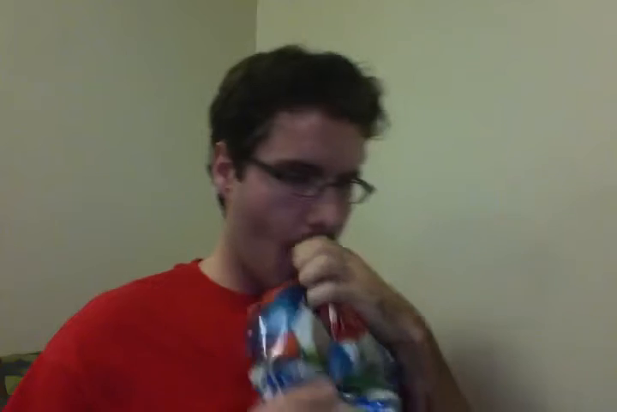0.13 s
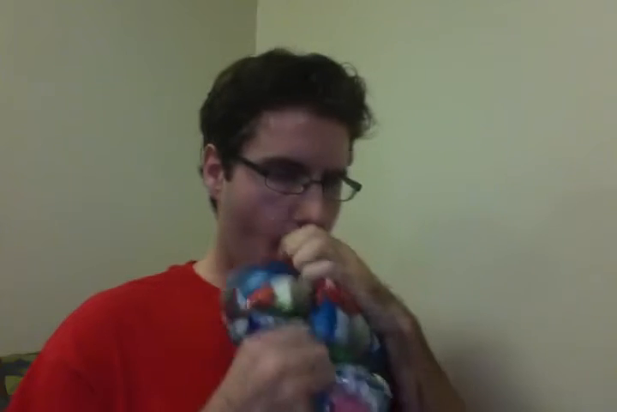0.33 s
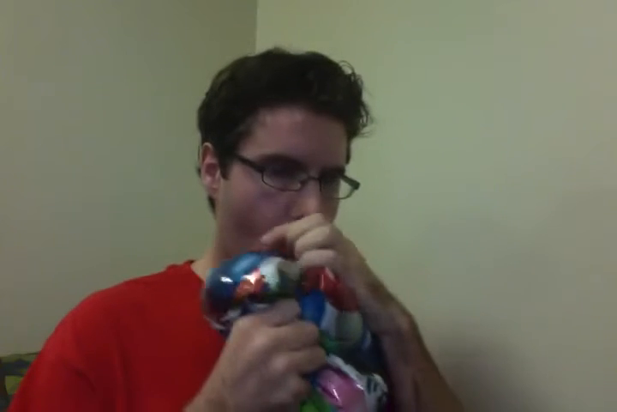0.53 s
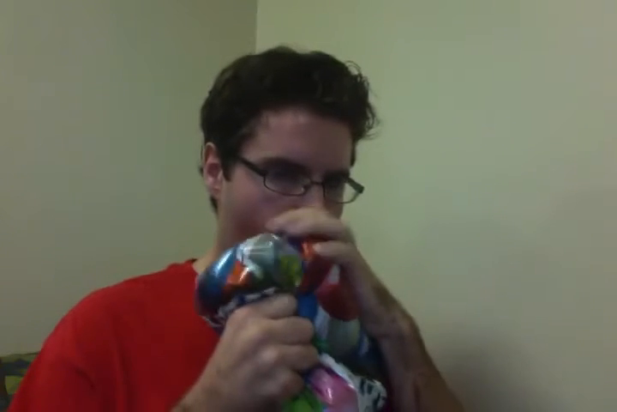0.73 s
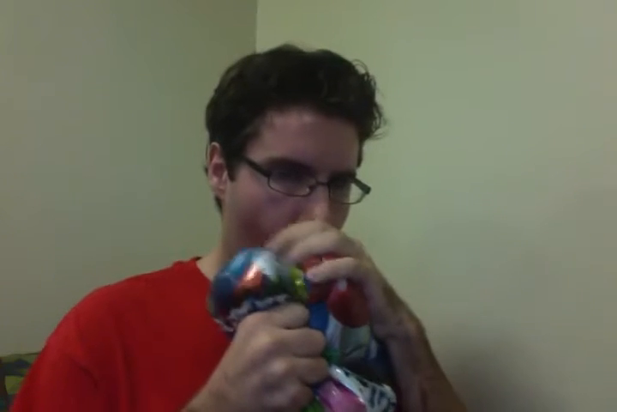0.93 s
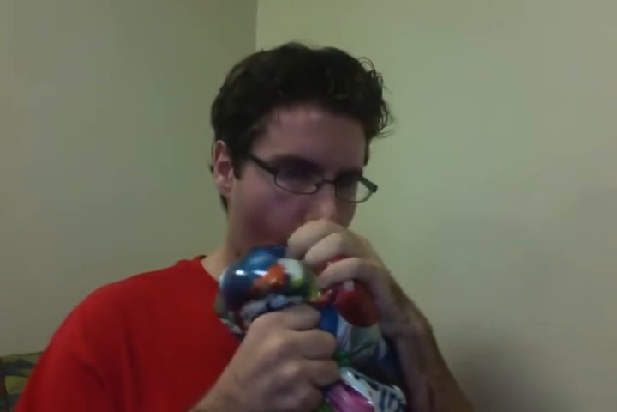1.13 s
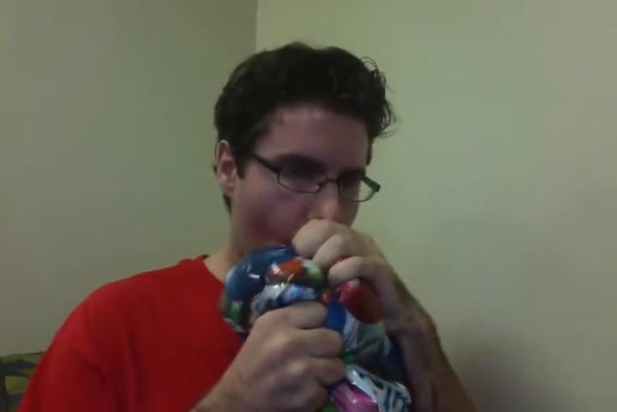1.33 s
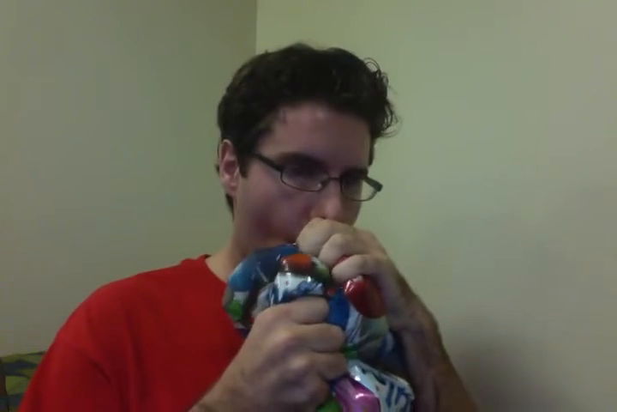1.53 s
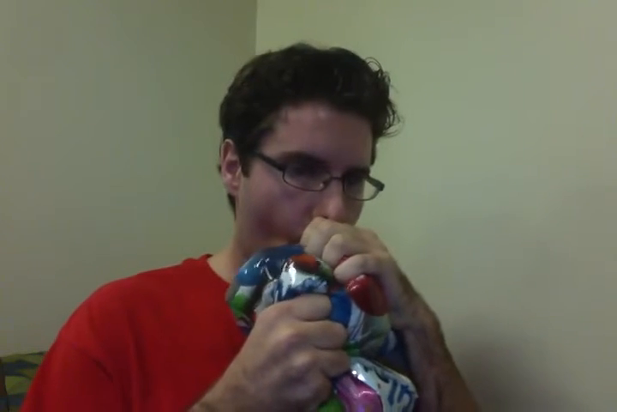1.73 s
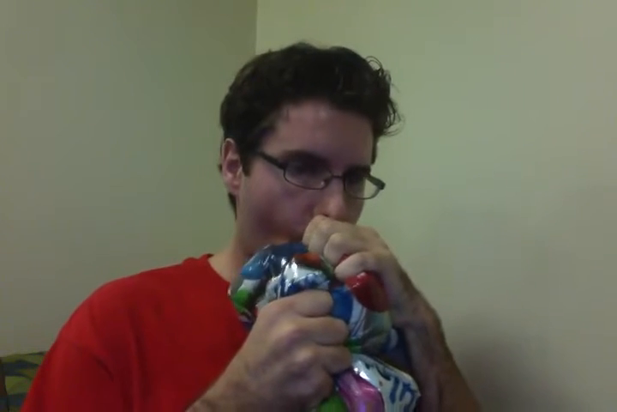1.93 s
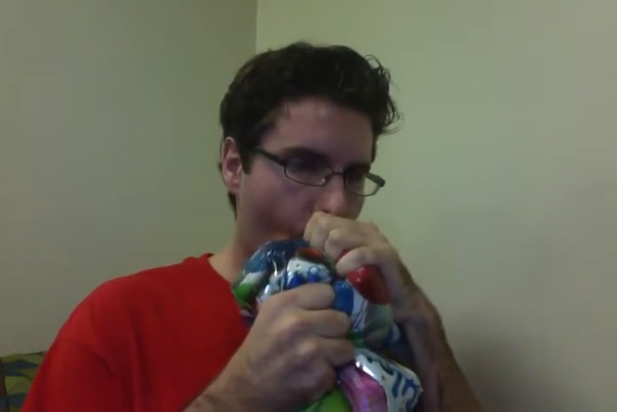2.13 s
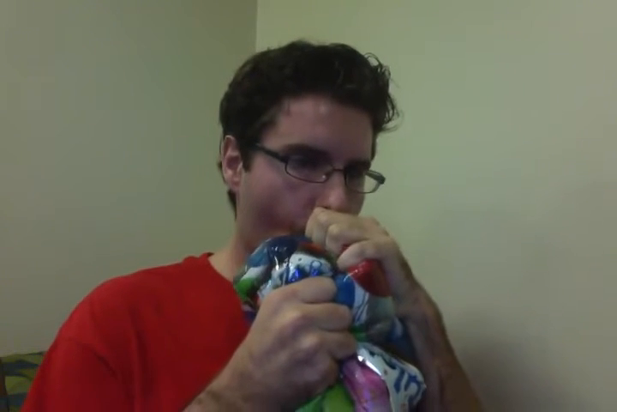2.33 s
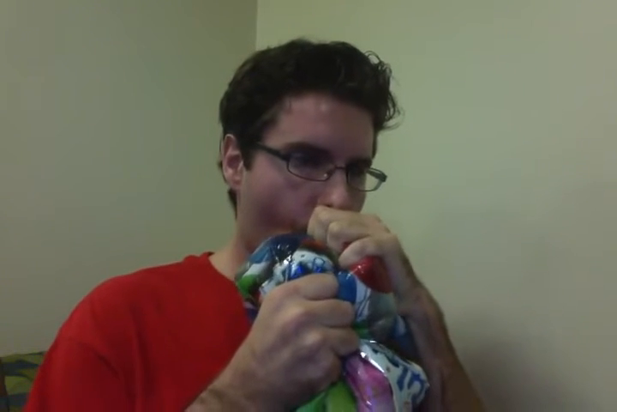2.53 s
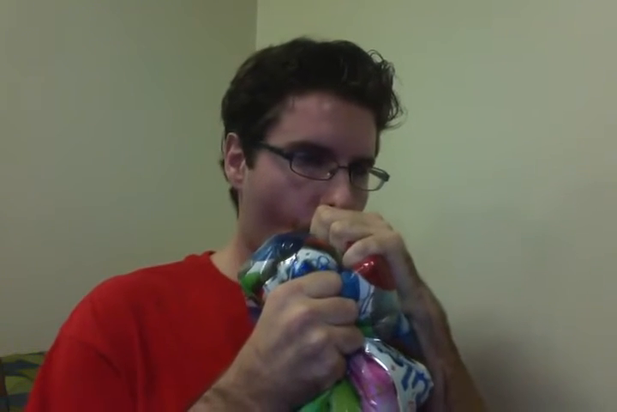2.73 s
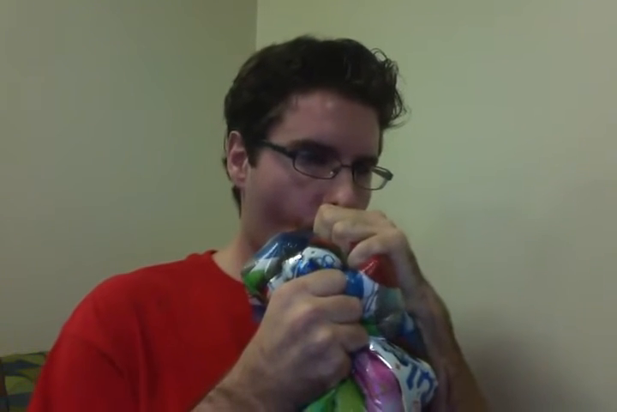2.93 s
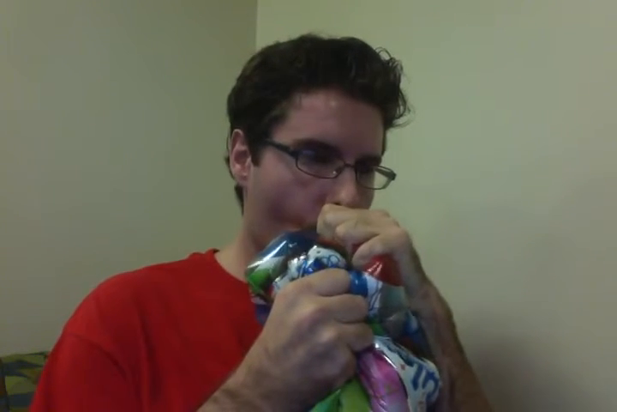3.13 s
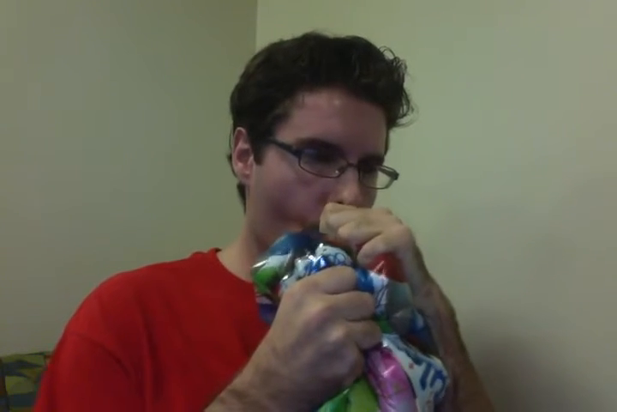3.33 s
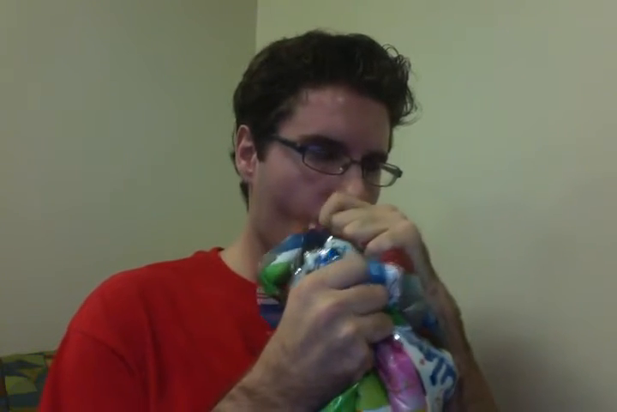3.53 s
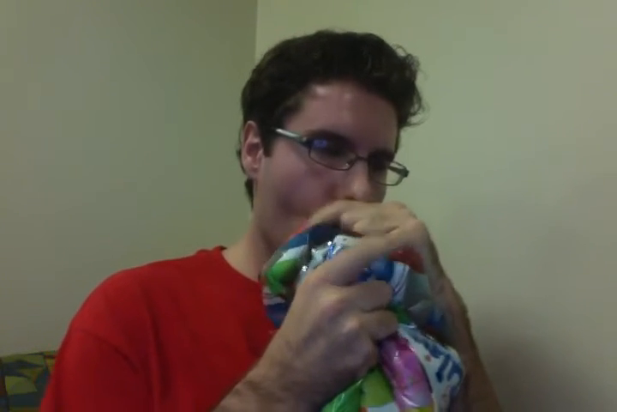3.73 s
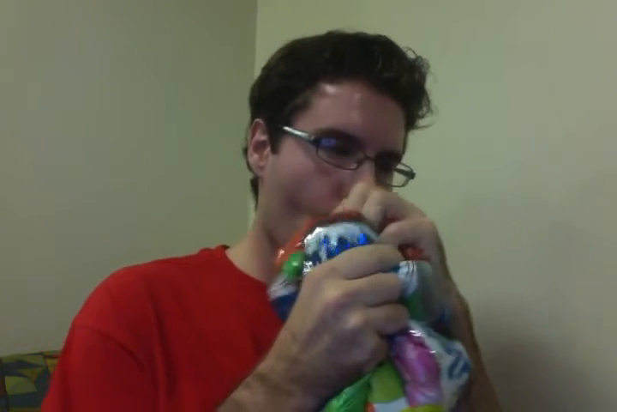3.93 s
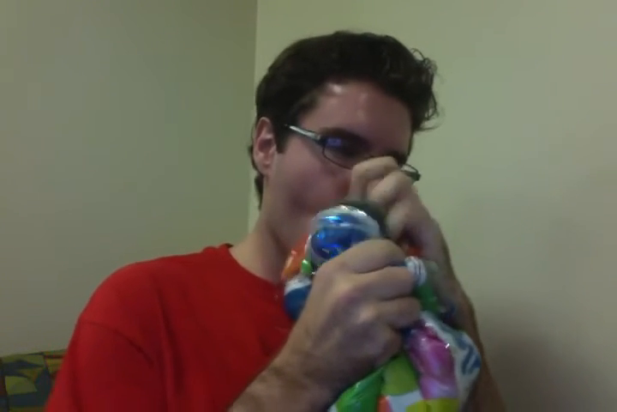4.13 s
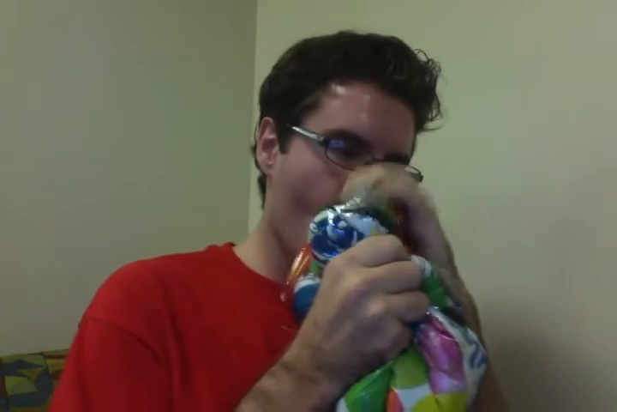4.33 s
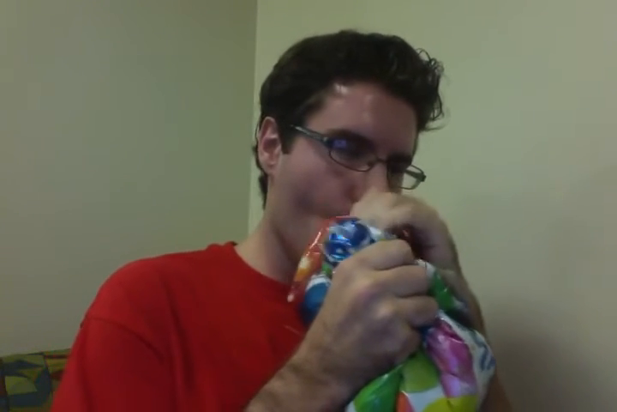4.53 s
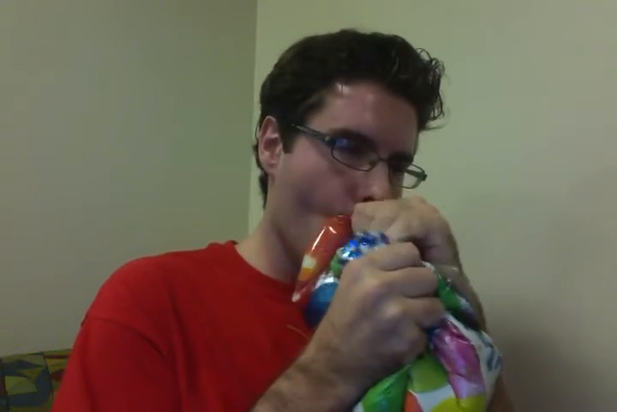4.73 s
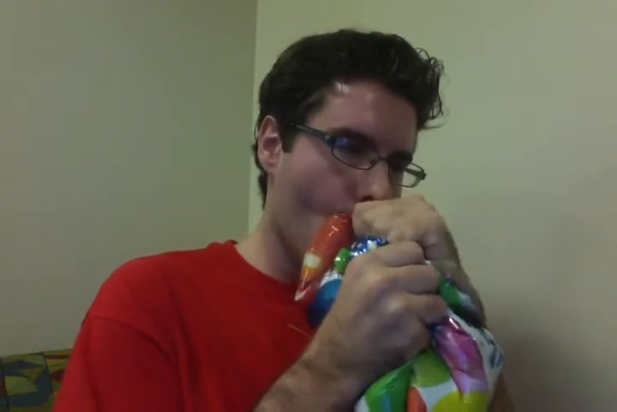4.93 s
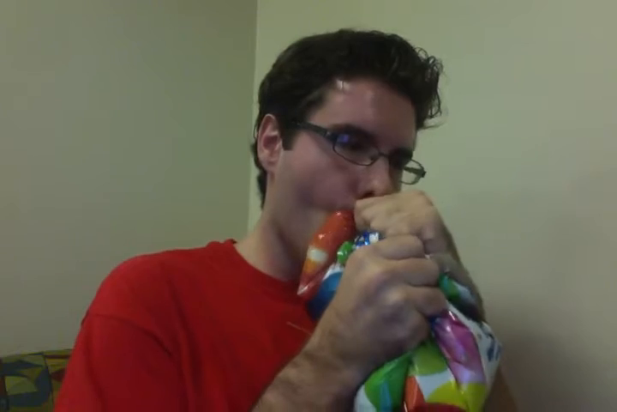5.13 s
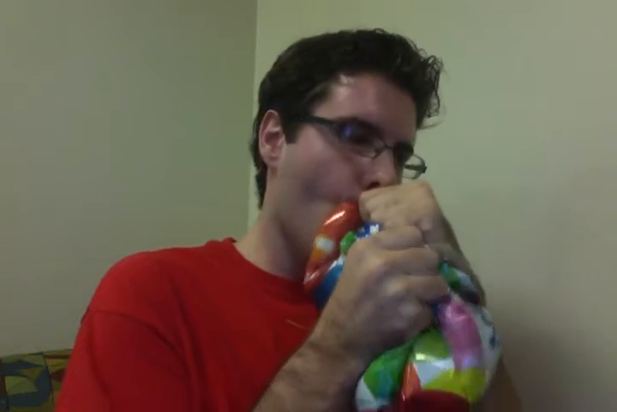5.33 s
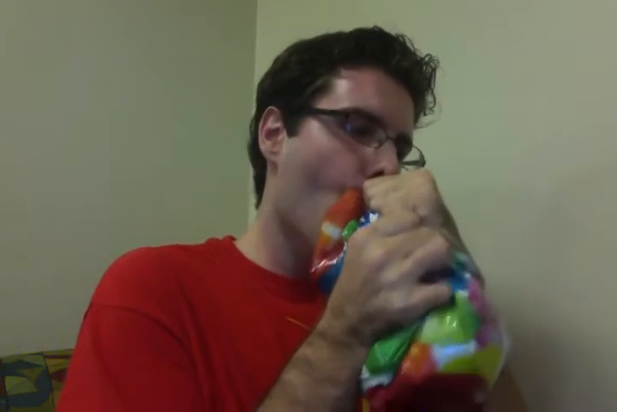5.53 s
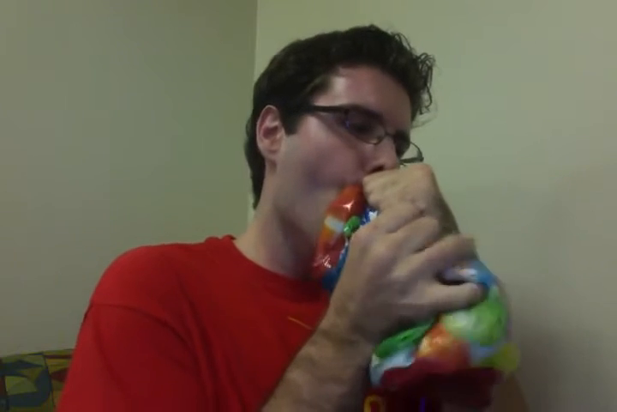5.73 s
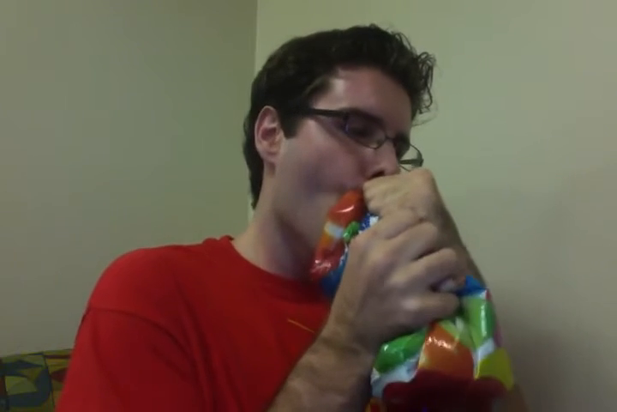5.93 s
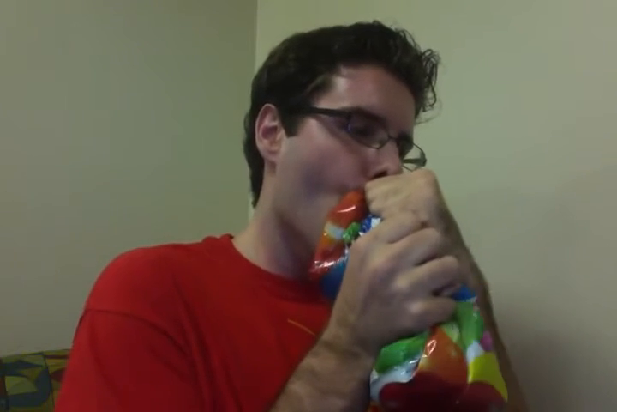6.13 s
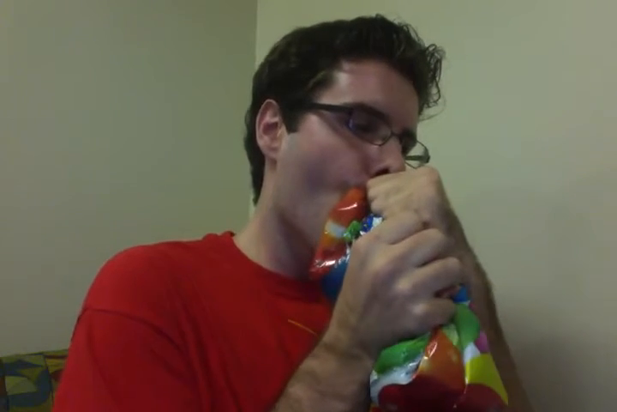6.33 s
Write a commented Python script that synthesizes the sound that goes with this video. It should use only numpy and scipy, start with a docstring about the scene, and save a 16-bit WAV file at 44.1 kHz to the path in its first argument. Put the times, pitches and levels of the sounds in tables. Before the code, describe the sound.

A foil balloon is crumpled by hand right at the microphone in a small bare room, with a faint steady hiss and a very short reverberant tail. From 0 to 0.6 s, bright dense crinkling surges, strongest around 0.4-0.55 s, with hollow low thumps of the slack bag. Until 1.5 s it continues as lighter crackle with quick ticks and a few knocks near 1.05 s. From 1.5 to 3.2 s it thins into sparse, small ticks and soft rustle, with a small ringing pop at 2.6 s. At 3.3 s a loud crunch breaks out; rough bursts follow at 3.65-4.2 s, with a hard snap at 3.85 s. It eases to moderate crackle until 5 s. Very sharp cracks cluster from 5.07 to 5.65 s, the loudest slightly overloaded. Afterwards a softer rustle fades, with a short clicky pop at 6.16 s and a few last ticks until about 6.5 s.

```python
"""Crumpling of an emptying foil balloon

A foil balloon is squeezed and gathered up by hand close to a microphone in a small room as its gas is drawn out.
Creases buckle in avalanches: decaying sines at random pitches make the dense crackle, with film rubbing between.
Sharp snaps (a crack, a tick and a panel's knock), two ringing pops and low thumps of the slack bag stand out of it.
A short tail of bare walls and a faint steady hiss surround them; the loudest peaks overload the microphone."""
import sys
import numpy as np
from scipy import signal
from scipy.fft import rfft, irfft
from scipy.io import wavfile
from scipy.ndimage import uniform_filter1d

SR = 44100
rng = np.random.default_rng(int(sys.argv[2]) if len(sys.argv) > 2 else 0)


def transcribe(u):
    """Save the signal u as a 16-bit wav file named by the first command-line argument.

    u: samples, shape (n,) or (channels, n), limited to [-1, 1]; the rate is SR.
    q: integer samples, one column per channel.
    """
    v = np.clip(np.atleast_2d(u).T, -1, 1)
    q = np.round(v * 32767).astype(np.int16)
    wavfile.write(sys.argv[1], SR, q)


N = 285768
TIME = np.arange(N) / SR  # s

# the steady grip between squeezes:
# (time [s], crackle level [dB], brightness of the ticks relative to it [dB])
GRIP = [(0, -23, -1.5), (0.62, -23.5, -2.5), (1.1, -26, -14), (1.5, -34, -3.5), (1.72, -29, -6.5),
        (1.959, -33.5, -13), (2.52, -40, -5.5), (2.72, -36.5, -7), (3.099, -34.5, -5), (3.501, -25.5, 0),
        (4.0, -26.5, 1.5), (4.361, -28.5, -4), (4.66, -25, -6.5), (4.899, -33.5, -5), (5.399, -25, -2),
        (5.74, -28.5, -7), (6.13, -39.5, -4), (6.48, -39.5, -2)]
# squeezes of the hand: (start [s], length [s], crackle level [dB],
# thump of the slack bag relative to it [dB], brightness of the ticks relative to it [dB])
SQUEEZES = [(0.047, 0.1127, -24.5, -7, 1), (0.208, 0.12, -24.5, -4, -7), (0.405, 0.0502, -17, -4.5, -8),
            (0.506, 0.0484, -17.5, -5, -4.5), (0.695, 0.091, -28.5, -32, -4), (0.907, .19, -27.5, -27, -2),
            (1.196, 0.0353, -23, -31, -2.5), (1.38, 0.0563, -26, -31, -6.5), (1.805, 0.017, -27, -10, -7),
            (1.873, 0.023, -29, -21, -19), (2.034, 0.027, -34.5, -5, -6), (2.2, 0.0417, -34.5, -5.5, -6),
            (2.415, 0.0392, -34.5, -27, -5.5), (2.671, 0.02, -37.5, -2, -17), (2.842, 0.023, -36, -6, -10),
            (3.322, 0.14, -22, -11.5, -1), (3.353, 0.045, -13.5, -13, -3.5),
            (3.639, 0.0625, -16, -13.5, -4.5), (3.739, 0.032, -19.5, -20, 2), (3.873, .04, -17, -10, -4),
            (3.935, 0.0823, -15.5, -17.5, -4), (4.161, 0.0782, -20, -18.5, -8.5),
            (5.215, 0.011, -14, -16, 1.5), (5.275, 0.066, -22, -11, -0.5), (5.465, 0.0742, -18, -5, -0.5),
            (5.589, 0.0492, -17.5, -13, -1.5), (5.861, 0.1977, -27.5, -15, -4)]
# single folds that snap through, before SNAP_LAG_S and the common tick gain are added:
# (time [s], tick level [dB], tick pitch [Hz], panel pitch [Hz], panel level [dB])
SNAPS = [(0.1054, 4, 8750, 2220, -24), (0.122, -10, 6730, 1850, -22.5), (0.176, -9.5, 9430, 2540, -26.5),
         (0.2766, -5, 7220, 2220, -30), (0.3114, -8, 7620, 1320, -14.5), (0.3955, -16.5, 6310, 740, -20),
         (0.4024, -19, 8550, 970, -12.5), (0.487, -8, 6650, 2200, -10), (0.4965, -14, 9200, 2760, -4.5),
         (0.574, 1, 9500, 1170, -27), (0.582, -7, 7200, 2200, -28), (0.65, -10, 9250, 2210, -19),
         (0.7528, -6, 6630, 1890, -12), (0.7823, -6.5, 8560, 1510, -28), (0.8054, -8, 8660, 1320, -20),
         (0.8884, -16, 7610, 1400, -20), (0.9108, -3, 7140, 2360, -23), (0.9164, -2, 10200, 1830, -14),
         (0.9624, -4, 9340, 1770, -21), (0.9852, -10, 7400, 795, -14.5), (1.007, -3.5, 8440, 2110, -30),
         (1.0368, -15.5, 7530, 1570, -19), (1.0786, -10, 7800, 1630, -12), (1.0945, -7, 9100, 2294, -14.5),
         (1.1148, -14, 8120, 2550, -21), (1.1883, -18, 7620, 810, -14.5), (1.1945, -3.5, 9600, 1490, -12),
         (1.2146, -2, 7100, 1220, -36), (1.2712, -3, 8250, 1980, -31), (1.326, -6, 10500, 2460, -26),
         (1.3419, -7, 7850, 3050, -20), (1.371, -1, 9700, 2280, -20), (1.3846, 3.5, 6700, 2650, -9.5),
         (1.394, -3, 6400, 3700, -16), (1.4215, -8, 9170, 790, -16), (1.4475, -16, 8660, 980, -16),
         (1.466, -12, 5910, 2300, -20), (1.559, -7.5, 9550, 1710, -24.5),
         (1.5908, -14.5, 7500, 1780, -14.5), (1.6125, -6, 7400, 1220, -21.5),
         (1.667, -13, 7660, 2020, -17.5), (1.6824, -2.5, 8100, 2410, -33), (1.8106, 0, 8240, 1880, -16),
         (1.8237, -15, 7250, 2930, -15.5), (1.8523, -5, 7200, 3310, -24), (1.8678, -23, 5260, 2570, -21),
         (1.8797, -22, 5800, 1950, -19), (1.9008, -11.5, 9200, 3400, -15.5),
         (1.9983, -13, 8550, 2470, -20.5), (2.0237, -11.5, 7970, 2400, -42), (2.08, -13, 7260, 1860, -38),
         (2.1077, -9.5, 7330, 1950, -26), (2.1288, 0.5, 8000, 1890, -42), (2.141, -9, 9300, 2930, -30),
         (2.197, -12.5, 9600, 1870, -27.5), (2.2576, -1.5, 8450, 2110, -23.5),
         (2.289, -11, 6790, 2880, -32), (2.2944, -3.5, 8740, 2300, -32), (2.3219, -5, 9400, 1830, -20),
         (2.327, -12, 6950, 2750, -23), (2.3345, -5.5, 7640, 2710, -28), (2.3978, -21.5, 8000, 1850, -24.5),
         (2.509, -5, 6800, 2120, -21), (2.5166, -4.5, 9100, 2300, -20.5), (2.5971, -21, 9570, 1490, -19.5),
         (2.6457, -5, 9700, 2010, -34), (2.7466, -14, 9600, 2530, -38), (2.797, -6.5, 8300, 845, -37),
         (2.823, -6, 8100, 913, -45), (2.923, -9, 9550, 2180, -35), (2.9515, -8, 9100, 1300, -22.5),
         (3.1307, -3.5, 9200, 2070, -45), (3.1368, -1, 9050, 2530, -33), (3.1618, -0.5, 8050, 3900, -27.5),
         (3.175, -4.5, 9300, 2490, -33), (3.266, -9.5, 8800, 1775, -16), (3.3193, -19, 9300, 1440, -11),
         (3.3557, -8, 9000, 1530, -9), (3.3727, 3, 8800, 1530, -3.5), (3.393, 7, 9200, 1310, -10.5),
         (3.4687, -2, 7710, 3180, -17.5), (3.4816, -17, 8710, 1210, -16.5), (3.5719, -1, 9100, 2200, -13),
         (3.669, 0, 7340, 1430, -20), (3.7627, -1, 7700, 2150, -12.5), (3.8065, -16, 9170, 2080, -13),
         (3.8486, 11, 8200, 1760, -12), (3.9862, -1, 7900, 2660, -11), (4.0792, -1.5, 8400, 2030, -17),
         (4.1903, -2, 9600, 2370, -23), (4.2274, -1.5, 7650, 2070, -13), (4.305, -19, 8420, 3180, -16.5),
         (4.3994, -11, 9000, 1870, -23), (4.4853, -3, 8700, 1940, -24), (4.5426, -2.5, 8570, 2260, -24.5),
         (4.6888, -32.5, 7580, 2700, -22), (4.8452, -8, 6950, 2620, -25), (4.9433, -2, 9100, 2690, -24.5),
         (4.9716, -6, 8150, 3440, -18.5), (5.074, 7, 8740, 1040, -17), (5.1383, -7.5, 6980, 900, -16),
         (5.1595, -5, 7100, 944, -20.5), (5.1915, 10, 8920, 1180, -17), (5.2183, -9, 9000, 910, -13),
         (5.305, -3.5, 9120, 690, -18), (5.329, -8.5, 8240, 1880, -19), (5.3439, 13, 8800, 2140, -14.5),
         (5.409, -3.5, 10070, 1820, -31.5), (5.4672, 8, 9100, 2000, -16), (5.489, 5, 8930, 2430, -9.5),
         (5.531, 3, 9000, 805, -11), (5.616, 8, 9600, 1940, -21), (5.6374, 11, 8300, 1350, -14),
         (5.7486, -4.5, 6660, 3385, -30), (5.7642, -6, 6700, 910, -29), (5.8027, 0, 8120, 833, -24.5),
         (5.8817, -1, 8950, 2500, -37), (5.9291, 2.5, 8400, 1140, -22), (5.9783, 1.5, 8900, 3300, -15.5),
         (5.987, -17, 10670, 2150, -15), (6.0834, 0, 8650, 970, -27), (6.1595, -2, 7100, 1590, -19.5),
         (6.2876, -9.5, 8650, 2460, -34), (6.4207, -6.5, 9200, 2240, -31)]
# modes of the two taut panels that pop, before SNAP_LAG_S and the gradual onset:
# (time [s], mode frequency [Hz], level [dB], decay time [s])
PANEL_MODES = [(2.5974, 618, -9.5, 0.0023), (2.5974, 934, -4, 0.0029), (2.5974, 1300, -8, 0.0025),
               (2.5974, 1770, -11.5, 0.0022), (2.5974, 3060, -17, 0.0038), (6.1599, 656, -7, 0.0031),
               (6.1599, 1680, 0, 0.001), (6.1599, 2060, 5.5, 0.00074)]
# big folds that thump the slack bag, before the common lag and gain:
# (time [s], level [dB], pitch [Hz])
THUMPS = [(0.25, -32, 250), (0.391, -9, 370.7), (0.475, -25, 80), (0.486, 0, 605), (0.493, -12, 258),
          (0.887, -6, 770), (1.036, -2.5, 730), (1.0771, 2, 750), (1.383, -13, 419.5), (1.613, -27.5, 173),
          (2.366, -32, 250), (2.529, -26.5, 264), (2.688, -32, 272), (3.772, -10, 380), (3.82, -16.5, 267),
          (3.846, -11, 406), (5.5, -32, 397), (6.067, -15.5, 475)]
# colour of the film while the bag is full: (frequency [Hz], relative gain [dB])
FULL_FOIL = [(40, -16), (115, -21.5), (180, -10.5), (250, -9), (330, -10), (420, -8.5), (700, 2.5),
             (1200, -1), (2300, -1), (4150, -5), (5100, -7), (7300, 4), (8150, -3), (9100, 4),
             (12500, -4.5), (16000, -12)]
# colour of the crumpled film: (frequency [Hz], relative gain [dB])
CRUMPLED_FOIL = [(40, -17), (115, -26.5), (180, -11.5), (315, -13.5), (400, -6.5), (700, 0.5), (1150, -2),
                 (2200, 1), (4100, -2.5), (5300, -9.5), (7400, 0), (8100, -10.5), (9000, 3.5),
                 (11500, -8.5), (13000, -9), (16000, -14)]
# spectral shape of the steady room noise: (frequency [Hz], relative gain [dB])
ROOM_NOISE = [(40, -18), (90, 10.5), (165, 23), (330, 14.5), (600, 18), (1000, 18), (2500, 8), (4000, 15),
              (9000, -27)]

EMPTYING_S = (1.9, 4.1)  # over this time the full bag turns into a crumpled one
ATTACK_S, RELEASE_S = 0.033, 0.029  # time constants of a squeeze
GRIP_REF_DB = -30  # a medium grip
SLACK_DB, SLACK_GROWTH = -42, 0.67  # the bag's rumble under a medium grip, and its dB per dB of grip
SNAP_LAG_S = 0.000904  # delay added to the listed times of snaps and ringing pops
ROOM_NOISE_DB = -45
TOP_HZ = 15900  # upper limit of the modes and of the microphone
CEILING = .9  # the microphone's overload point, as amplitude


def crackle(gains, panel_db=-0.41, tick_db=-1.0):
    """Crackling noise: avalanches of creases move the whole bag, ring its panels and tick at their sharp tips."""
    bag_gain, panel_gain, tip_gain = gains
    level_db = 20 * np.log10(panel_gain)
    surge = avalanches()
    bag = creases(level_db, surge, lo_hz=106.0, hi_hz=587.0, rate=220, growth=0.64,
                  cycles=0.55, spread_db=6.0, rustle_db=-10.5)
    panels = creases(level_db, surge, lo_hz=457, hi_hz=5070, rate=950, growth=0.9,
                     cycles=1.0, spread_db=1.5, rustle_db=-4)
    tips = creases(level_db, surge, lo_hz=4800, hi_hz=14940, rate=400, growth=1.15,
                   cycles=2.06, spread_db=1.5, rustle_db=-2.0)
    return bag_gain * bag + undb(panel_db) * panel_gain * panels + undb(tick_db) * tip_gain * tips


def effort():
    """Addition of powers: the steady grip plus squeezes that swell, hold and let go drive bag, panels and tips."""
    s, *columns = np.transpose(GRIP)
    grip_db, bright_db = (np.interp(TIME, s, column) for column in columns)
    slack_db = SLACK_DB + SLACK_GROWTH * (grip_db - GRIP_REF_DB)
    power = undb([slack_db, grip_db, grip_db + bright_db]) ** 2
    for start, length, db, slack_db, tips_db in SQUEEZES:
        swell = np.minimum(TIME - start, 0) / ATTACK_S
        release = np.maximum(TIME - start - length, 0) / RELEASE_S
        shape = np.exp(swell - release)
        power = power + np.outer(undb([db + slack_db, db, db + tips_db]) ** 2, shape ** 2)
    return np.sqrt(power)


def avalanches(rate=110, fade_s=.0013, spread=.8, share=.6, slipping=.45, slip_rate=30):
    """Avalanche and stick-slip: a crease sets off neighbours in a fading run, while the fingers slip and catch."""
    sizes = np.exp(spread * np.minimum(rng.standard_normal(N), 2))
    triggers = (rng.random(N) < rate / SR) * sizes
    runs = signal.lfilter([1], [1, -np.exp(-1 / (fade_s * SR))], triggers + 1e-18)
    return (1 - share + share * runs / runs.mean()) * np.exp(slipping * walk(slip_rate))


def creases(level_db, surge, lo_hz, hi_hz, rate, growth, cycles, spread_db, rustle_db):
    """Random buckling: a harder squeeze pops more creases, each at its own pitch; film rubs on film between."""
    pops_per_s = rate * undb(growth * (level_db + 25)) * surge
    start = np.flatnonzero(rng.random(N) < pops_per_s / SR)
    place, sign = rng.random((2, N))[:, start]
    size, damping = np.clip(rng.standard_normal((2, N))[:, start], -3, 2.4)
    hz = lo_hz + (hi_hz - lo_hz) * place
    ring_s = cycles * np.exp(.3 * damping) / hz
    # a crease pops inwards or outwards; most are tiny, a few are large
    size = np.sign(sign - .5) * undb(spread_db * size) / np.sqrt(ring_s)
    ticks = film(grains(start, hz, size, ring_s))
    rustle = film(band(rng.standard_normal(N) * surge ** 0.11, lo_hz, hi_hz, order=4))
    return (steady(ticks) + undb(rustle_db) * steady(rustle)) / np.hypot(1, undb(rustle_db))


def grains(start, hz, size, ring_s):
    """Superposition of damped oscillations, each of which swells within a cycle or two and dies away."""
    length = (7 * ring_s * SR).astype(int)  # samples in each ring
    owner = np.repeat(np.arange(len(start)), length)  # the ring that each sample belongs to
    step = np.arange(len(owner)) - (np.cumsum(length) - length)[owner]
    age = step / (SR * ring_s[owner])
    envelope = size[owner] * np.sqrt(age) * np.exp(-age)
    wave = envelope * np.sin(2 * np.pi * hz[owner] * step / SR)
    return np.bincount(start[owner] + step, wave, N)[:N]


def film(x, shift=0.016, flex_rate=45):
    """Resonant colouring: a full bag has one fixed spectrum; that of the crumpled film moves in pitch as it flexes."""
    crumpled = np.interp(TIME, EMPTYING_S, [0, 1])
    tension = (1 + np.tanh(2 * walk(flex_rate))) / 2
    slack = colour(x, np.array(CRUMPLED_FOIL) * [np.exp(-shift), 1])
    taut = colour(x, np.array(CRUMPLED_FOIL) * [np.exp(shift), 1])
    flexing = (1 - tension) * slack + tension * taut
    return (1 - crumpled) * colour(x, FULL_FOIL) + crumpled * flexing


def steady(x):
    """Power normalisation: hold the mean power near one, so that the squeeze alone sets the loudness."""
    window = int(.065 * SR)
    power = uniform_filter1d(uniform_filter1d(x ** 2, window), window)
    return x / np.sqrt(np.abs(power) + np.mean(power) / 10 ** 3)


def snaps(tick_gain_db=-2.5, give_db=-23, give_s=0.0016, size=1100):
    """Snap-through buckling: each loud fold gives a little just before it snaps."""
    out = np.zeros(N + SR)
    chances = rng.standard_normal((len(SNAPS), 4, size))
    for (s, tick_db, tick_hz, panel_hz, panel_db), chance in zip(SNAPS, chances):
        lead_s = give_s * (.5 + abs(chance[3, -1]))
        for at, db, draws in ((s, 0, chance[:2]), (s - lead_s, give_db, chance[2:])):
            start = max(int((at + SNAP_LAG_S) * SR), 0)
            sound = fold(tick_db + tick_gain_db, tick_hz, panel_hz, panel_db, draws)
            out[start:start + size] += undb(db) * sound
    return out[:N]


def small_snaps(gains, count=36, panel_hz=2200, panel_spread=0.437, tick_hz=7600, tick_spread=0.25,
                panel_db=-31, tick_db=-15, growth=0.36, spread_db=-1.5, size=1100):
    """Load-dependent buckling: lesser folds give way at random, more often and louder under a harder press."""
    out = np.zeros(N + SR)
    busy = np.cumsum(np.sqrt(gains[1]))
    starts = np.searchsorted(busy, rng.random(count) * busy[-1])
    traits = np.clip(rng.standard_normal((count, 4)), -2, 2)
    chances = rng.standard_normal((count, 2, size))
    for start, (tip, panel, tick, knock), chance in zip(starts, traits, chances):
        _, press_db, tips_db = growth * (20 * np.log10(gains[:, start]) - GRIP_REF_DB)
        out[start:start + size] += fold(
            tips_db + tick_db + spread_db * tick, tick_hz * np.exp(tick_spread * tip),
            panel_hz * np.exp(panel_spread * panel), press_db + panel_db + spread_db * knock, chance)
    return out[:N]


def fold(tick_db, tick_hz, panel_hz, panel_db, chance, crest_db=14, crack_db=11.0):
    """Impulsive excitation: a sharp crack, the tick of a tip and the lower, longer knock of its panel."""
    knock = flick(panel_hz, cycles=0.66, spread=0.79, scatter_db=-3.0, scatter_s=0.0052, draws=chance[0])
    knock = band(knock, lo_hz=384, hi_hz=7500)
    tick = tip_tick(tick_hz, chance[1])
    impulse = signal.unit_impulse(len(tick))
    crack = colour(band(impulse, lo_hz=1800, hi_hz=12500, order=1), CRUMPLED_FOIL)
    # the crack is strongest where tip and panel both give way hard
    crack_gain = undb(crack_db + (tick_db + panel_db) / 2)
    return undb(panel_db) * knock + undb(tick_db - crest_db) * tick + crack_gain * crack


def tip_tick(hz, draws, cycles=0.8, vary=0.25):
    """Wave packet: the tip of a crease jumps in a smooth burst, sometimes dry, sometimes almost a pitch."""
    turns = np.arange(len(draws)) / SR * hz
    width = cycles * np.exp(vary * np.tanh(draws[-1]))
    wave = np.exp(-.5 * (turns / width - np.pi) ** 2) * np.sin(2 * np.pi * turns)
    return scattered(wave, scatter_db=-8, scatter_s=0.0071, draws=draws)


def flick(hz, cycles, spread, scatter_db, scatter_s, draws):
    """Modal vibration: a patch of film flips and rings briefly in uneven modes around its pitch."""
    t = np.arange(len(draws)) / SR
    place = np.linspace(-1, 1, 7)
    place = place + 0.13 * draws[:len(place)]
    mode_hz = np.minimum(hz * np.exp(spread * place), TOP_HZ)
    weight = np.exp(-1.1 * place ** 2) * (-1) ** np.arange(len(place))
    age = t[:, None] * np.sqrt(mode_hz * hz) / cycles
    modes = weight * np.sin(2 * np.pi * mode_hz * t[:, None]) * age * np.exp(-age)
    return scattered(modes.sum(axis=1), scatter_db, scatter_s, draws)


def scattered(wave, scatter_db, scatter_s, draws):
    """Scattering: the folds nearby spread a short sound into a brief tail."""
    scatter = draws * np.exp(-np.arange(len(draws)) / SR / scatter_s)
    scatter = scatter / np.linalg.norm(scatter)
    wave = wave + undb(scatter_db) * signal.fftconvolve(wave, scatter)[:len(wave)]
    return wave / np.sqrt(np.sum(wave ** 2) / (.005 * SR))  # unit rms if spread over 5 ms


def rings(rise_s=0.00076):
    """Free vibration: a taut panel pops and its distinct modes decay within milliseconds."""
    out = np.zeros(N + SR)
    t = np.arange(SR // 20) / SR
    for k, (s, hz, db, decay_s) in enumerate(PANEL_MODES):
        start = int((s + SNAP_LAG_S) * SR)
        envelope = np.exp(-t / decay_s) * (1 - np.exp(-t / rise_s))
        sense = (-1) ** k  # neighbouring modes swing in opposite senses
        out[start:start + len(t)] += sense * undb(db) * np.sin(2 * np.pi * hz * t) * envelope
    return out[:N]


def thumps(gain_db=-1, lag_s=0.00244, size=3000):
    """Heavily damped resonance: a big fold gives way and the slack bag knocks for a cycle or two."""
    out = np.zeros(N + SR)
    for (s, db, hz), chance in zip(THUMPS, rng.standard_normal((len(THUMPS), size))):
        knock = flick(hz, cycles=0.59, spread=0.6, scatter_db=-2, scatter_s=0.002, draws=chance)
        knock = band(knock, lo_hz=.5 * hz, hi_hz=5000)
        start = max(int((s + lag_s) * SR), 0)
        out[start:start + size] += undb(db + gain_db) * knock / np.abs(knock).max()
    return out[:N]


def room(x, wall_db=-17, t60_s=0.19, treble_db=-8):
    """Reverberation: bare walls return a short decaying tail whose narrow treble band dies away faster."""
    t = np.arange(SR // 2) / SR
    low, high = rng.standard_normal((2, len(t)))
    treble = band(high, 6440, 6460) * np.exp(-t / 0.06)
    tail = band(low, 84.0, 5500) + undb(treble_db) * treble
    onset = np.clip(t / 0.00032 - 1, 0, 1)  # silent for 0.32 ms, then rising as long
    tail = tail * undb(-60 * t / t60_s) * onset
    return x + signal.fftconvolve(x, undb(wall_db) * tail / np.linalg.norm(tail))[:N]


def background():
    """Stationary noise: random noise shaped in frequency gives the faint steady hiss of the room."""
    hz = np.arange(N // 2 + 1) * SR / N
    hiss = irfft(rfft(rng.standard_normal(N)) * gain_at(ROOM_NOISE, hz), N)
    return undb(ROOM_NOISE_DB) * unit(hiss)


def colour(x, points, size=2048):
    """Minimum phase: a causal filter with the given (Hz, dB) response, from the folded cepstrum."""
    cepstrum = irfft(np.log(gain_at(points, np.arange(size // 2 + 1) * SR / size)))
    cepstrum[1:size // 2] *= 2
    cepstrum[size // 2 + 1:] = 0
    return signal.fftconvolve(x, irfft(np.exp(rfft(cepstrum))))[:len(x)]


def gain_at(points, hz):
    """Logarithmic frequency scale: gain of a (Hz, dB) spectrum, interpolated at the given frequencies."""
    f, db = np.transpose(points)
    return undb(np.interp(np.log(np.maximum(hz, 1)), np.log(f), db))


def band(x, lo_hz, hi_hz, order=2):
    """Band limitation: a causal Butterworth band-pass."""
    sos = signal.butter(order, [lo_hz, min(hi_hz, SR / 2 - 1)], "band", fs=SR, output="sos")
    return signal.sosfilt(sos, x)


def walk(rate):
    """Slow random modulation: levels held 1 / rate s and slewed, with an rms of one."""
    k = max(int(SR / rate), 1)
    held = np.repeat(rng.standard_normal(N // k + 1), k)
    return unit(uniform_filter1d(held, k)[:N])


def unit(x):
    """Root mean square: scale to an rms of one."""
    return x / np.sqrt(np.mean(x ** 2) + 1e-18)


def undb(db):
    """Level and amplitude: decibels to gain."""
    return 10 ** (np.asarray(db) / 20)


def scene():
    """Superposition: crackle, snaps, pops and thumps in the room, plus its hiss, on one channel."""
    gains = effort()
    balloon = crackle(gains) + snaps() + rings() + thumps() + small_snaps(gains)
    return (room(balloon) + background())[None]


def record(dry, low_cut_hz=55):
    """Overload and bandwidth: the microphone flattens the highest peaks, thins the bass and cuts the top."""
    flattened = np.clip(dry, -CEILING, CEILING)
    bass_cut = signal.butter(1, low_cut_hz, "high", fs=SR, output="sos")
    top_cut = signal.ellip(10, .2, 70, TOP_HZ, fs=SR, output="sos")
    return signal.sosfilt(top_cut, signal.sosfilt(bass_cut, flattened))


dry = scene()
out = record(dry)
transcribe(out)
```